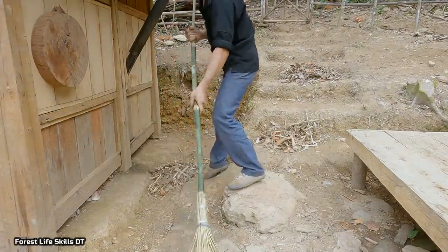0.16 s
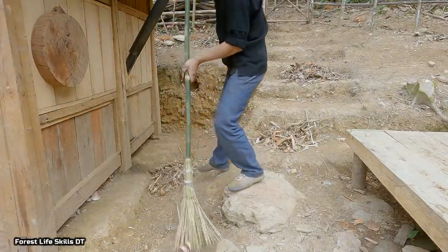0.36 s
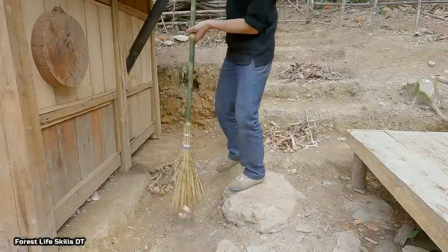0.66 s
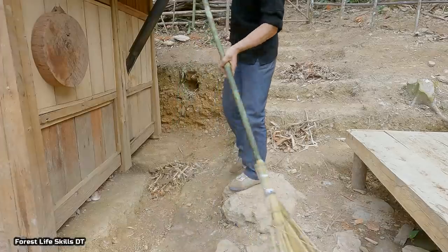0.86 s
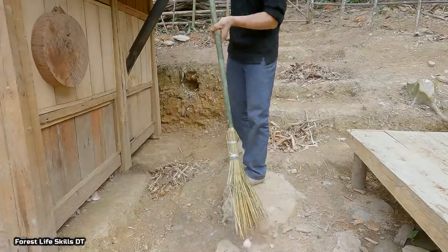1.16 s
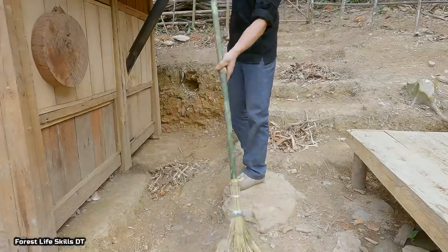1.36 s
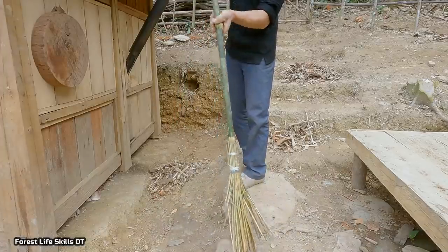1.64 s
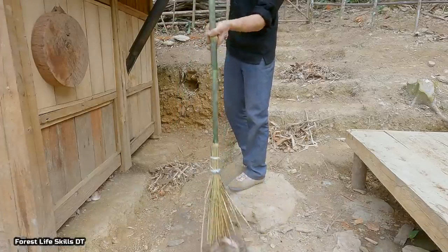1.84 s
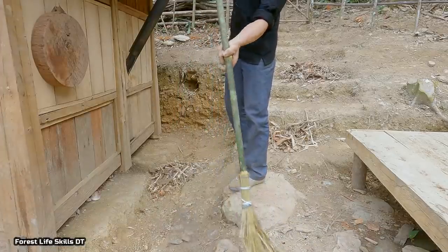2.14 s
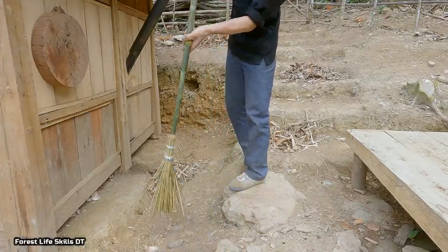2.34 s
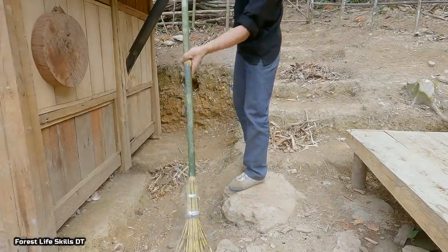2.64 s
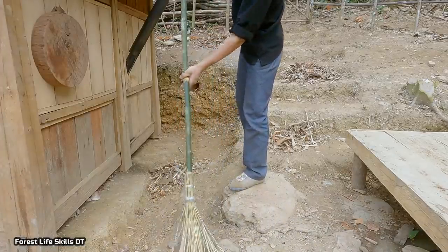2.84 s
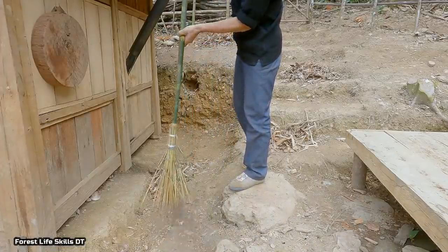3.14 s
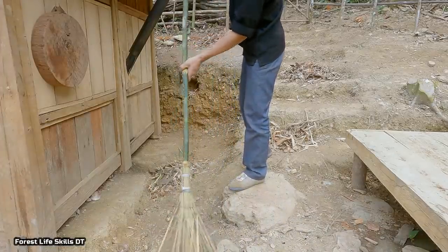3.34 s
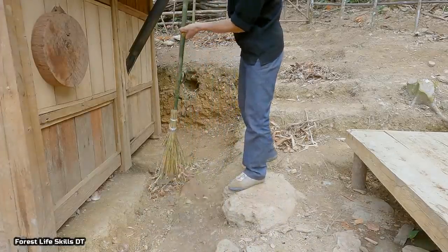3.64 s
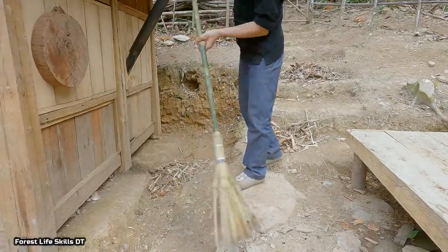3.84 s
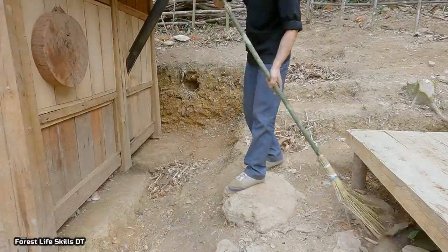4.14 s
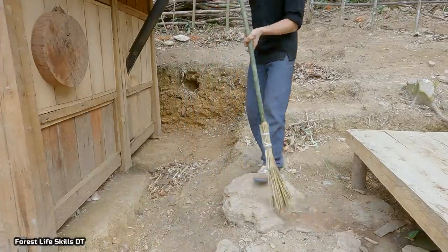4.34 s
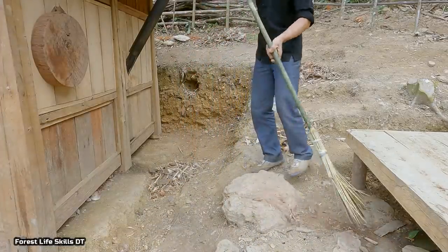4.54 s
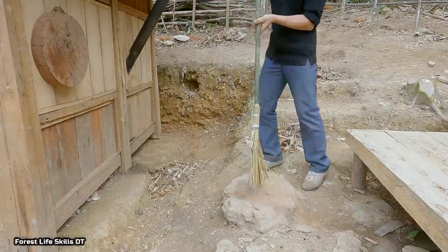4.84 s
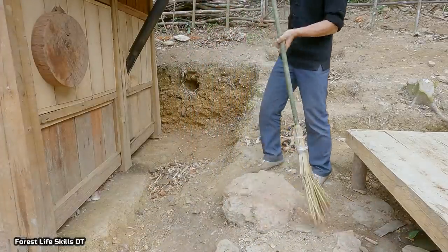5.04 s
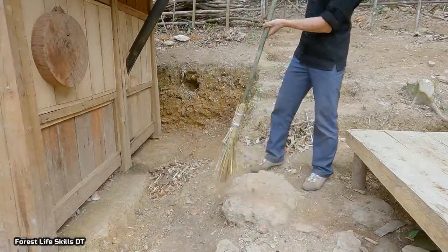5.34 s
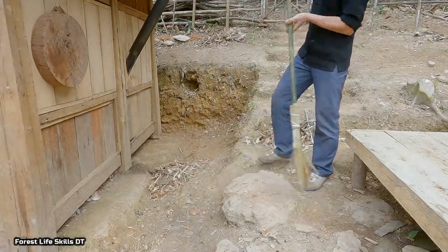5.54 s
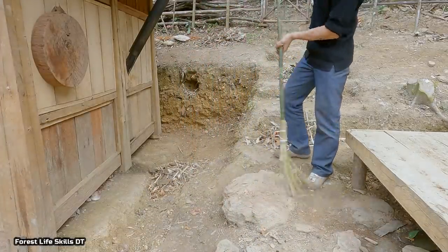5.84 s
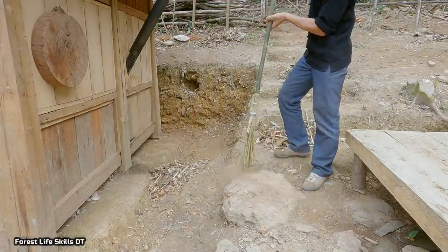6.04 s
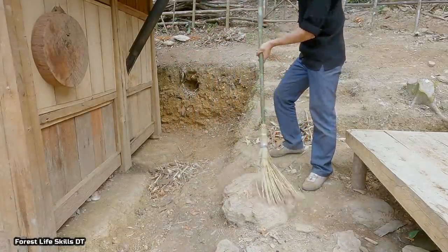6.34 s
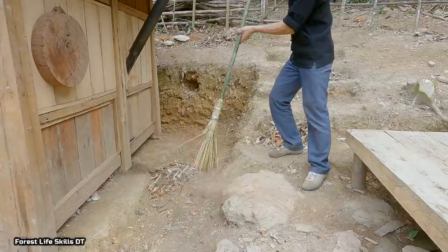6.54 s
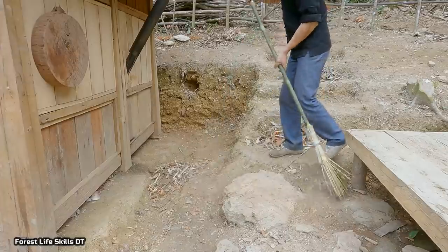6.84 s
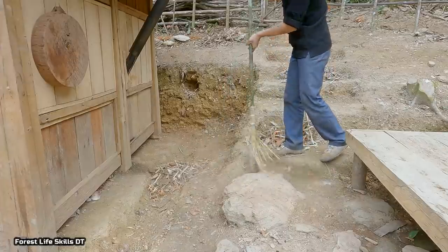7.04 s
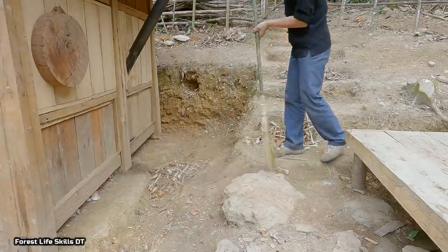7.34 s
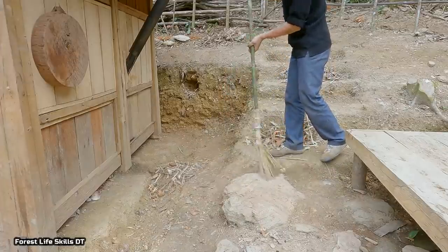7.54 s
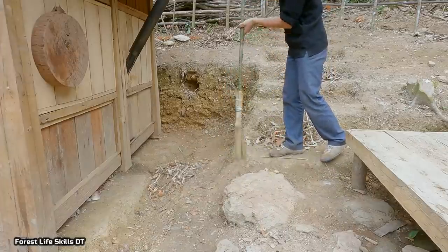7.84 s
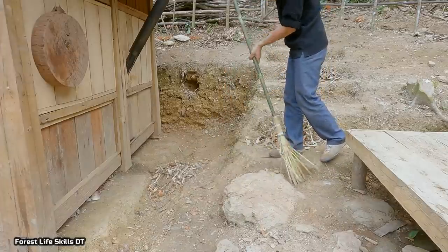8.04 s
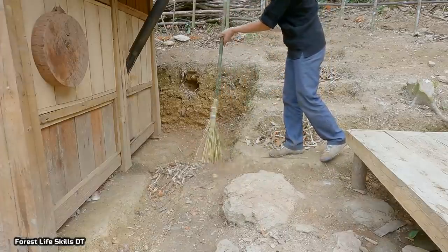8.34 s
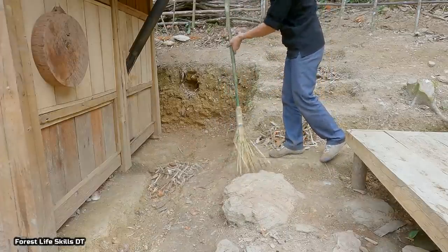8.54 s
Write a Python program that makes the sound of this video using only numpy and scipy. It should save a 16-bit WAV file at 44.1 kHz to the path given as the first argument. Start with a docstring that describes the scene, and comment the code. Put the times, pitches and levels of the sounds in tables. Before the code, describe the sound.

A stiff straw broom sweeps dry litter on packed earth outdoors, heard close and almost dry, with faint short echoes from planks and an earth bank. After slight rustling, the first long scratch arrives at 0.4 s, followed by shorter strokes near 1.1, 1.5, 1.9 and 2.3 s, with bright slaps and twig snaps thickest around 2 s. A fuller, longer rasp runs from 2.9 to 3.2 s, then strokes at 3.5, 4.2, 4.8 and 5.3 s, with light scuffs between. At 5.85 s the handle rattles quickly on a wooden bench, a hollow knock with another dull tap at 6 s, as a stroke carries on. Further scratches come at 6.5, 7.0, 7.6 and 8.2 s, with a sharp snap near 7.8 s. Grit ticks, soft low thuds, faint thin chirps and very quiet open air remain beneath until a last small rustle at 8.6 s.

```python
"""Straw broom on packed earth

A straw broom sweeps leaves, twigs and grit by a plank wall: noise of random bristle slips in half-octave
bands, plus ringing stalks. Slaps, snaps and grit tick as short noise cracks or clicks; ground thuds and
duller knocks are resonant noise bursts. The handle rattles briefly on a bench edge, as struck modes.
Faint chirps and brief lower notes are throbbing narrow noise; open air is a banded noise bed."""
import sys
import numpy as np
from scipy import signal
from scipy.io import wavfile

SR = 44100
rng = np.random.default_rng(int(sys.argv[2]) if len(sys.argv) > 2 else 0)


def wav_out(sig):
    """Save sig, one row per channel (or a flat mono array), as 16-bit PCM at SR to the path in sys.argv[1]."""
    wavfile.write(sys.argv[1], SR, np.round(np.clip(np.atleast_2d(sig).T, -1, 1) * 32767).astype(np.int16))


N = 383229

# Broom strokes: touch t/s, resting level/dB, push t/s, rise to full/s, full level/dB, lift t/s,
# lift level/dB, release/s, debris level/dB, debris decay/(dB/s), rumble/dB, brightness/dB, left-right/dB
STROKES = [(.365, -36, 0.41, 0.032, -24.5, 0.62, -27.5, .08, -56, 46, 2.5, -4, -1.5),
           (1.089, -30.5, 1.156, 0.033, -25.5, 1.276, -32.5, 0.049, -45, 170, 1, -13, -3),
           (1.496, -34, 1.5, 0.043, -28, 1.69, -32, .12, -57, 145, 3.5, -9, -2.5),
           (1.888, -31, 1.95, .04, -32, 2.035, -29.5, 0.048, -45.5, 85, 6.5, -6, -2.5),
           (2.303, -31, 2.372, .035, -27.5, 2.456, -35.5, 0.061, -51.5, 91, -2.5, 0, -2.5),
           (2.893, -34, 2.915, .055, -24, 3.152, -29, 0.039, -45.5, 150, 2, -0.5, -1.5),
           (3.532, -28, 3.576, .06, -24.5, 3.665, -27, 0.094, -50.5, 62, 0.5, 0.5, -1.8),
           (4.224, -35, 4.344, .04, -24, 4.478, -29.5, 0.098, -55, 49, 0.5, -9, -3),
           (4.791, -37.5, 4.805, 0.034, -27, 4.97, -30.5, 0.041, -44.5, 81.5, 1, -8, -3),
           (5.27, -32, 5.3, .03, -26.5, 5.472, -31, 0.057, -48, 104, -4.5, -9, -3),
           (5.845, -34, 5.88, .015, -27, 5.895, -28.5, .016, -36, 298, 20, -30, -4.5),
           (5.92, -33.5, 5.935, 0.031, -25, 6.1, -26.5, 0.084, -51, 70, -2, -8, -3.5),
           (6.444, -32.5, 6.534, 0.018, -26, 6.637, -26, 0.073, -45.5, 70.5, -4, -6, -2),
           (7.01, -35, 7.1, 0.095, -28, 7.233, -30.5, 0.14, -48, 32, 1.5, -10, -3),
           (7.424, -37.5, 7.445, .02, -39.5, 7.38, -37.5, 0.14, -57, 80, 11, -6, -1),
           (7.602, -40.5, 7.678, 0.014, -26, 7.79, -29.5, .02, -60, 200, 0, -8, -2.3),
           (7.783, -31, 7.81, .01, -28, 7.835, -29, .07, -50, 150, 3, -6, -2.5),
           (8.215, -36, 8.297, .012, -26, 8.43, -30, .075, -44, 62, 2.5, -10, -2.5)]
# Feet and returning broom brushing the litter: peak t/s, level/dB, length/s
SCUFFS = [(0.0, -52, .12), (0.241, -57, 0.086), (0.335, -58.5, 0.12), (1.076, -44, 0.055), (1.36, -49, .07),
          (1.46, -57, .06), (2.518, -45, 0.053), (2.64, -58.5, .08), (2.787, -65, 0.062),
          (2.89, -48, 0.028), (3.267, -56, .08), (3.315, -47, 0.043), (3.362, -58, 0.065), (3.43, -58, .05),
          (3.499, -55.5, 0.087), (3.89, -56.5, 0.13), (4.65, -57, 0.08), (5.11, -51.5, .08),
          (5.22, -57, 0.069), (5.72, -53.5, 0.14), (5.829, -59, 0.086), (6.34, -50, 0.11),
          (6.402, -58, 0.061), (6.441, -47, .02), (7.5, -47, .06), (7.97, -54, .06), (8.06, -62, .06),
          (8.18, -61, .05), (8.602, -50.5, 0.13)]
# Bristle scratch spectrum: f/Hz, relative density/dB
SCRATCH = [(26, -65), (45, -31), (153, -22), (269, -13.5), (327, -11.5), (408, -13.5), (547, -13),
           (734, -16), (1570, -3), (1730, 1.5), (2500, -7), (3040, 0), (5740, 1.5), (12000, -18),
           (15700, -18.5)]
# Ringing of the bound bundle: f/Hz, width/Hz, gain/dB
STRAW = [(1068, 243, 1), (1554, 39, 3), (2270, 237, 0.5), (5030, 410, -7)]
# Bristle slaps, twig snaps, clearest grit: t/s, peak level/dB, centre f/Hz
TICKS = [(0.2075, -41, 4010), (0.3707, -31, 4650), (0.4319, -15.5, 3380), (0.8412, -30.5, 6800),
         (0.8939, -43, 4280), (0.9507, -43.5, 3940), (1.055, -33, 3990), (1.0929, -21, 4810),
         (1.4416, -29, 4960), (1.512, -14, 1600), (1.724, -20.5, 6230), (1.8517, -41, 4040),
         (1.9051, -28, 5240), (1.9677, -14.5, 4560), (1.9779, -12, 4360), (2.0094, -12.5, 5460),
         (2.2156, -33, 5870), (2.3239, -9.5, 5360), (2.5613, -31, 1610), (2.76, -46, 4400),
         (2.7922, -40, 3850), (2.8783, -41, 2890), (2.8958, -26, 4650), (2.9093, -21, 4980),
         (2.9428, -12, 4870), (3.2286, -34, 4990), (3.3139, -31, 5930), (3.4276, -39.5, 6990),
         (3.4406, -32.5, 2400), (3.5334, -24.5, 5790), (3.546, -22, 5500), (3.8484, -37, 3980),
         (3.8901, -39, 3210), (3.9043, -35, 5600), (4.051, -43, 5580), (4.2345, -20.5, 3740),
         (4.3765, -13.5, 5230), (4.6184, -34.5, 4860), (4.6628, -33, 1870), (4.7315, -41, 3970),
         (4.8092, -13.5, 5860), (5.0594, -27, 5150), (5.1921, -39, 3970), (5.2036, -35, 4500),
         (5.22, -32.5, 1740), (5.2813, -22.5, 5330), (5.3148, -17, 2420), (5.6017, -28, 2320),
         (5.658, -37, 6420), (5.8563, -20, 1530), (5.8767, -24, 4800), (5.93, -21.5, 1590),
         (6.2861, -43, 2150), (6.3121, -34, 1600), (6.343, -26.5, 5560), (6.4273, -28, 3770),
         (6.45, -26, 3440), (6.537, -16.5, 1570), (6.901, -37, 4530), (7.0248, -13.5, 5757),
         (7.44, -26.5, 4430), (7.5283, -29.5, 5660), (7.5607, -31.5, 5820), (7.6158, -15.5, 5300),
         (7.6912, -13.5, 5700), (7.7797, -26, 3430), (7.813, -8, 3400), (8.0586, -33, 5200),
         (8.15, -39.5, 5609), (8.2197, -31, 4820), (8.2367, -26, 6650), (8.3095, -15.5, 3820),
         (8.4003, -13, 6030), (8.537, -30, 2780)]
# Low bursts (ground thuds, duller ticks and knocks near 600-700 Hz):
# t/s, burst level/dB, burst centre f/Hz, shudder level/dB
LOW_BURSTS = [(0.209, -51.5, 212, -78), (.94, -58, 180, -65), (1.051, -44.5, 176, -51),
              (1.515, -41, 150, -44), (1.905, -37, 191, -52), (2.185, -52, 600, -75),
              (2.321, -34, 140, -41), (2.895, -53, 288, -53), (2.985, -46, 150, -62), (3.31, -51, 300, -72),
              (3.647, -44.5, 176, -58), (3.853, -50.5, 164, -74), (4.75, -56, 600, -80),
              (5.098, -53, 700, -80), (5.277, -39.5, 270, -56), (5.858, -23, 600, -44),
              (5.895, -34, 140, -48), (5.945, -39, 160, -55), (6.008, -29, 700, -60),
              (6.317, -45.5, 256, -68), (6.46, -44, 300, -68), (7.019, -47, 160, -75),
              (7.45, -47, 220, -70), (7.62, -47, 200, -75)]
# Handle bouncing on the bench edge: t/s, strength/dB
HANDLE_BOUNCES = [(5.85, -37.5), (5.858, -25.5), (5.861, -22.5), (5.8651, -22), (5.882, -29)]
# Bench modes: f/Hz, level/dB, t60/s
BENCH_MODES = [(221, -4, .1), (266, -6, .09), (369, -1, .08), (476, -10, .06), (616, -3, .08),
               (683, -8, .06), (808, -5, .08), (924, -4, .07), (1007, -9, .06), (1188, 5, .05),
               (1500, -8, .04), (2185, -11, .04)]
# Wall and earth-bank echoes: delay/s, left level/dB, right level/dB
WALL_ECHOES = [(.004, -33, -35), (.011, -29, -21), (0.022, -13.5, -18)]
# Narrow chirps (insect-like near 4 kHz, brief notes near 1.6 kHz): start t/s, length/s, f/Hz, level/dB
CHIRPS = [(0.09, 0.1, 4120, -68), (0.198, 0.16, 4050, -58.5), (0.678, .12, 3870, -65),
          (2.497, 0.036, 1600, -51), (2.58, 0.023, 1620, -57), (2.615, 0.041, 1620, -65),
          (2.77, 0.089, 4040, -75), (3.152, 0.062, 1590, -58), (3.33, 0.038, 1600, -68),
          (3.375, 0.14, 3990, -59), (4.063, 0.11, 4100, -80), (4.272, 0.027, 1620, -40.5),
          (4.533, 0.04, 1620, -63), (4.664, 0.12, 4100, -60), (5.928, 0.042, 1600, -37),
          (6.71, 0.041, 1560, -55), (6.933, 0.087, 4020, -58), (7.048, 0.072, 1594, -44.5),
          (7.31, 0.072, 1610, -51)]
# Open-air spectrum: f/Hz, relative density/dB
AIR = [(16, -45), (28, 12), (97, -5), (174, 14.5), (288, 9), (766, -11), (1610, 5), (2660, -59),
       (3950, 8.5), (5580, -2), (7270, -18), (9470, -57), (12000, -27), (15700, -48)]
# Air hiss above 1 kHz, relative to the bass: t/s, level/dB
AIR_TREBLE = [(0, 2.5), (1.0, -2.5), (1.85, -1), (2.85, -3), (4.15, -1), (5.2, 2), (6.25, 1), (7.0, 1),
              (7.6, -2), (8.1, -4), (8.69, 1)]
# Left-right likeness of banded noise: f/Hz, correlation (no unit)
LIKENESS = [(60, 0.71), (250, 0.37), (640, 0.38), (1400, 0.54), (3100, 0.56), (6800, 0.65), (15000, 0.1)]

STILL_DB = -75  # litter at rest
APPROACH_S, APPROACH_DB = .03, 14.5  # first tips brush the litter before touch
TOUCH_S, TOUCH_RISE_DB = .015, 23.5
TOUCH_RUMBLE_DB = -2  # added at touch: tips alone move little earth
LIFT_BRIGHT_DB, LIFT_PAN_DB = 4, 1  # added from full push to lift: tips speed up; image moves left
DEBRIS_RUMBLE_DB, DEBRIS_BRIGHT_DB, DEBRIS_PAN_DB = -2, 0, -1
FULL_SLIPS_PER_S, SLIP_SPREAD_DB = 6000, 3
STALK_CYCLES, STALK_DB, PLUCKS_PER_S = 90, -17, 600  # cycles per t60; plucks per stalk
TICK_LOW_HZ, TICK_TOP_HZ = 1080, 7550
TICK_PAN_DB, TICK_SCATTER_DB = -0.5, 0.5
GRIT_PER_S, GRIT_DB = 70, 7.5  # level relative to the broom, before the band-pass
BURST_T60_S, SHUDDER_T60_S = .15, .34
SHUDDER_PITCH = 0.44  # share of burst centre
CHIRP_WIDTH_HZ, CHIRP_THROB_HZ = 66, 45
AIR_DB = -67.5
MIC_LOW_HZ, CUTOFF_HZ = 34.8, 16050
MIC_SHELF_HZ, MIC_SHELF_DB = 8230, -3


def from_db(db):
    """Decibels to gain."""
    return 10 ** (np.asarray(db) / 20)


def rms_one(x):
    """Scale to rms 1."""
    return x / np.sqrt(np.mean(x ** 2) + 1e-20)


def in_time(rows):
    """Interpolate each column of a curve table at every sample."""
    s, *columns = np.transpose(rows)
    return [np.interp(np.arange(N) / SR, s, c) for c in columns]


def at_hz(points, hz):
    """Read a spectrum table on a log-frequency axis."""
    f, values = np.array(points).T
    return np.interp(np.log(hz), np.log(f), values)


def sides(pan_db):
    """Left and right gains; positive pan favours the left."""
    return from_db(np.array([pan_db / 2, -pan_db / 2]))


def drift(rate_hz):
    """Slow chance at rms 1: coarse noise through a double one-pole low-pass, then interpolated."""
    r = np.exp(-80 * np.pi * rate_hz / SR)  # one draw per 40 samples
    noise = rng.standard_normal(N // 40 + 2002)
    slow = signal.lfilter([1], [1, -2 * r, r * r], noise)[2000:]
    return np.interp(np.arange(N) / 40, np.arange(len(slow)), rms_one(slow))


def resonance(x, hz, width_hz):
    """Two-pole band-pass with about unit peak gain."""
    r = np.exp(-np.pi * width_hz / SR)
    zeros = np.array([1, 0, -1]) * (1 - r * r) / 2
    return signal.lfilter(zeros, [1, -2 * r * np.cos(2 * np.pi * hz / SR), r * r], x)


def ring(clicks, hz, t60_s):
    """Decaying sine: a unit click starts it at height 1."""
    r, w = from_db(-60 / (t60_s * SR)), 2 * np.pi * hz / SR
    return signal.lfilter([0, np.sin(w)], [1, -2 * r * np.cos(w), r * r], clicks + 1e-18)


def coloured(white, spectrum, shape_db):
    """Half-octave bands of (2 draws, mid/side, N) into stereo; shape_db(hz) moves each band in time."""
    out, power = 0, 0
    edges = 28 * 2 ** np.arange(0, 9.6, .5)
    for k, (low, high) in enumerate(zip(edges, edges[1:])):
        band = signal.butter(2, [low, high], "band", fs=SR, output="sos")
        mid, side = signal.sosfilt(band, white[k % 2])  # neighbours use different draws
        hz = np.sqrt(low * high)
        alike = np.clip(at_hz(LIKENESS, hz), 0, 1)
        level = from_db(at_hz(spectrum, hz))
        power += level ** 2 * (high - low) * 2 / SR
        stereo = np.sqrt(1 + alike) * mid + np.sqrt(1 - alike) * side * [[1], [-1]]
        out = out + level * from_db(shape_db(hz)) * stereo
    return out / np.sqrt(power)


def sweeping():
    """Broom level, rumble, brightness and pan: touch, rest, push, drag, lift, debris settling; plus scuffs."""
    t, power, colour = np.arange(N) / SR, from_db(2 * STILL_DB), []
    for (touch, rest_db, push, rise, full_db, lift, lift_db, release,
         debris_db, settles, rumble, bright, pan) in STROKES:
        times = np.maximum.accumulate([touch - APPROACH_S, touch, touch + TOUCH_S, push, push + rise,
                                       lift, lift + release, lift + release + 1])
        tips_db = rest_db - TOUCH_RISE_DB
        levels = [tips_db - APPROACH_DB, tips_db, rest_db, rest_db, full_db,
                  lift_db, debris_db, debris_db - settles]
        active = (t >= times[0]) * (t < times[-1])
        power = power + from_db(2 * np.interp(t, times, levels)) * active
        colour += [(touch, rumble + TOUCH_RUMBLE_DB, bright, pan),
                   (times[4], rumble, bright, pan),
                   (times[5], rumble, bright + LIFT_BRIGHT_DB, pan + LIFT_PAN_DB),
                   (times[6], DEBRIS_RUMBLE_DB, DEBRIS_BRIGHT_DB, DEBRIS_PAN_DB)]
    for s, db, length_s in SCUFFS:
        power = power + from_db(2 * db) * np.exp(-(4 * (t - s) / length_s) ** 2)
    return [10 * np.log10(power), *in_time(sorted(colour))]


def bristles(level_db, rumble_db, bright_db, pan_db):
    """Tips slip at random moments with uneven force; bunches of them catch and let go together."""
    shape = (2, 2, N)
    spread_db = SLIP_SPREAD_DB * np.minimum(rng.exponential(1, shape), 5)
    sizes = from_db(spread_db) * rng.choice([-1, 1], shape)
    busy = np.clip(from_db(.4 * (level_db + 29)), .05, 1)  # harder stroke, more tips slipping
    slips = sizes * (rng.random(shape) < FULL_SLIPS_PER_S * busy / SR) / np.sqrt(busy)
    rub = rms_one(rms_one(slips) + 0.66 * rng.standard_normal(shape))
    uneven = 1.0 + 2.84 * (1 - busy)  # loose debris rustles more unevenly
    bunches_db = uneven * (drift(27.6) + 0.2 * drift(220))

    def shape_db(hz):
        """Low bands follow rumble, top bands brightness; each band is patchy."""
        low = np.clip(np.log2(1200 / hz), 0, 1)
        top = np.clip(np.log2(hz / 5500), 0, 1)
        patches_db = 1.27 * uneven * drift(13.4)
        return low * rumble_db + top * bright_db + (1 - low) * bunches_db + patches_db

    scratch = coloured(rub, SCRATCH, shape_db)
    bundle = sum(from_db(db) * resonance(scratch, hz, width_hz) for hz, width_hz, db in STRAW)
    return from_db(level_db - 5.5) * sides(pan_db) * (scratch + bundle)


def stalks(level_db, pan_db):
    """Single stalks are rubbed in short runs and ring at their own pitch, each from its own place."""
    out = np.zeros((2, N))
    for hz in np.geomspace(500, 13000, num=90) * rng.uniform(0.96, 1.03, size=90):
        runs_db = 5 * drift(12)
        hits = rng.standard_normal(N) * (rng.random(N) < PLUCKS_PER_S / SR)
        plucks = hits * from_db(level_db + runs_db)
        gain = from_db(at_hz(SCRATCH, hz)) * (hz / 4000) ** 1.115
        tone = gain * ring(plucks, hz, STALK_CYCLES / hz)
        lag, place_db = rng.integers(-12, 13), rng.normal(0, 2.9)  # lag in samples
        out += sides(place_db)[:, None] * np.array([tone, np.roll(tone, lag)])
    high_pass = signal.butter(2, 400, "high", fs=SR, output="sos")  # a stalk moves no bass
    return from_db(STALK_DB) * sides(pan_db) * signal.sosfilt(high_pass, out)


def ticks():
    """Crack plus short noise tail, strongest round its centre; louder hits tend to last longer."""
    out, t = np.zeros((2, N + SR)), np.arange(SR // 8) / SR
    band = signal.butter(2, [TICK_LOW_HZ, TICK_TOP_HZ], "band", fs=SR, output="sos")
    for s, db, hz in TICKS:
        mid, side = rng.standard_normal((2, len(t)))
        pan_db = rng.normal(TICK_PAN_DB, TICK_SCATTER_DB)
        t60_s = np.clip(0.052 + 0.0018 * (db + 29.5), .028, .07)
        tail = (1 - np.exp(-t / 0.00039)) * from_db(-60 * t / t60_s)
        crack = 1.1 * np.exp(-t / 0.00086)
        broad = signal.sosfilt(band, (mid + .5 * side * [[1], [-1]]) * (tail + crack))
        shaped = 0.49 * broad + resonance(broad, hz, 0.39 * hz)
        at = round(s * SR)
        out[:, at:at + len(t)] += from_db(db) * sides(pan_db)[:, None] * shaped / np.abs(shaped).max()
    return out[:, :N]


def grit(level_db):
    """Thrown grains: lone clicks at random moments, scaled by broom level, scattered left and right."""
    sizes = from_db(2.7 * np.minimum(rng.exponential(1, N), 4) + GRIT_DB + level_db)
    clicks = sizes * (rng.random(N) < GRIT_PER_S / SR) * sides(rng.normal(0, 2.7, N))
    return resonance(clicks + 1e-18, 4500, 5400)


def bursts(rows, width_share, rise_s):
    """Noise bursts that die away, each coloured round its own centre."""
    out, t = np.zeros((2, N + SR)), np.arange(SR // 4) / SR
    for s, db, hz, t60_s in rows:
        mid, side = rng.standard_normal((2, len(t)))
        envelope = (1 - np.exp(-t / rise_s)) * from_db(-60 * t / t60_s)
        burst = (mid + 0.18 * side * [[1], [-1]]) * envelope
        shaped = resonance(resonance(burst, hz, width_share * hz), hz, 2 * width_share * hz)
        at = round((s - rise_s) * SR)
        out[:, at:at + len(t)] += from_db(db) * shaped / np.abs(shaped).max()
    return out[:, :N]


def low_bursts():
    """Ground thuds and duller ticks and knocks, each with a deeper, longer shudder under it."""
    upper = [(s, db, hz, BURST_T60_S) for s, db, hz, _ in LOW_BURSTS]
    shudders = [(s, deep_db, SHUDDER_PITCH * hz, SHUDDER_T60_S) for s, _, hz, deep_db in LOW_BURSTS]
    return bursts(upper, 0.79, 0.00402) + bursts(shudders, 0.97, 0.01024)


def handle_knock():
    """Each handle bounce strikes every bench mode with a strength of its own."""
    times_s, strengths_db = np.array(HANDLE_BOUNCES).T
    at, out = [round(s * SR) for s in times_s], np.zeros(N)
    for k, (hz, level_db, t60_s) in enumerate(BENCH_MODES):
        clicks = np.zeros(N)
        clicks[at] = from_db(strengths_db + level_db + rng.normal(0, 0.63, len(at)))
        out += (-1) ** k * ring(clicks, hz, t60_s)  # neighbouring modes in opposite phase
    return out * sides(-2.5)[:, None]


def wall(x):
    """Adds dull echoes off the planks and earth bank: delayed, low-passed mono copies."""
    dull, out = signal.lfilter([.5], [1, -.5], x.mean(axis=0)), x.copy()
    for delay_s, left_db, right_db in WALL_ECHOES:
        lag = round(delay_s * SR)
        out[:, lag:] += from_db([[left_db], [right_db]]) * dull[:-lag]
    return out


def chirps():
    """Narrow chirps and brief notes: noise twice through a narrow resonance, throbbing in level."""
    out = np.zeros((2, N))
    for s, length_s, hz, db in CHIRPS:
        at, t = round(s * SR), np.arange(round(length_s * SR)) / SR
        noise = rng.standard_normal((2, len(t)))
        tone = resonance(resonance(noise, hz, CHIRP_WIDTH_HZ), hz, CHIRP_WIDTH_HZ)
        stereo = rms_one(tone + tone[::-1] * 0.32)  # part of each side in the other
        throb = 1 + .3 * np.sin(2 * np.pi * (CHIRP_THROB_HZ * t + rng.random()))
        out[:, at:at + len(t)] += from_db(db) * stereo * throb * signal.windows.tukey(len(t), .8)
    return out


def air():
    """Open air: banded noise, each band drifting in level, treble on its own curve."""
    treble_db, = in_time(AIR_TREBLE)

    def shape_db(hz):
        """Random drift per band, plus the treble curve above 1 kHz."""
        return 1.9 * drift(8.0) + (hz > 1000) * treble_db

    return from_db(AIR_DB) * coloured(rng.standard_normal((2, 2, N)), AIR, shape_db)


def scene():
    """Broom; ticks, grit, low bursts and handle knock with wall echoes; air and chirps."""
    level_db, rumble_db, bright_db, pan_db = sweeping()
    broom = bristles(level_db, rumble_db, bright_db, pan_db) + stalks(level_db, pan_db)
    impacts = ticks() + grit(level_db) + low_bursts() + handle_knock()
    return broom + wall(impacts) + air() + chirps()


def record(dry):
    """Microphone: high-pass on deep bass, downward treble shelf, steep low-pass at the top."""
    heard = signal.sosfilt(signal.butter(2, MIC_LOW_HZ, "high", fs=SR, output="sos"), dry)
    below = signal.sosfiltfilt(signal.butter(6, MIC_SHELF_HZ, fs=SR, output="sos"), heard)
    heard = below + from_db(MIC_SHELF_DB) * (heard - below)
    return signal.sosfilt(signal.cheby2(12, 70, CUTOFF_HZ, fs=SR, output="sos"), heard)


dry = scene()
out = record(dry)
wav_out(out)
```